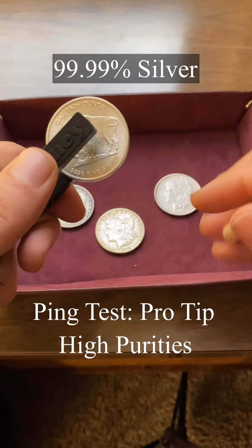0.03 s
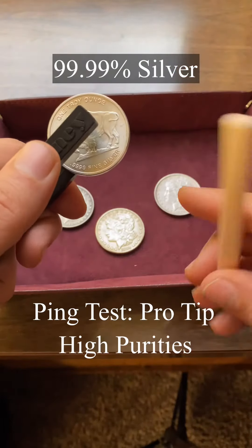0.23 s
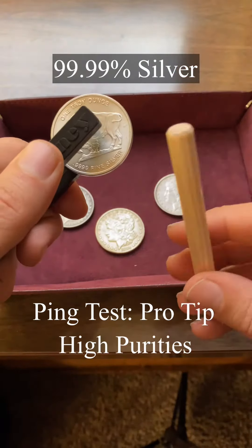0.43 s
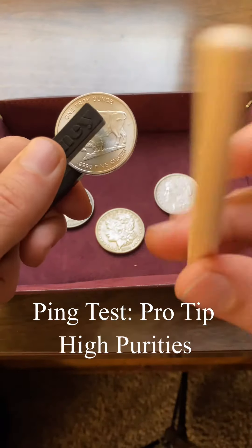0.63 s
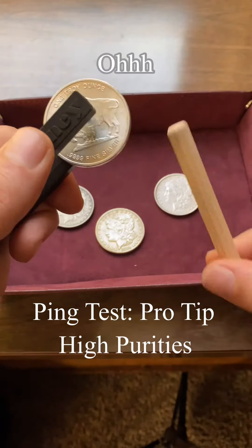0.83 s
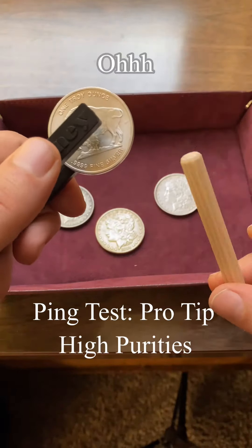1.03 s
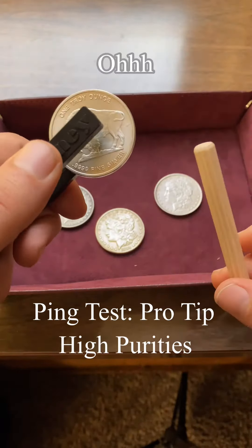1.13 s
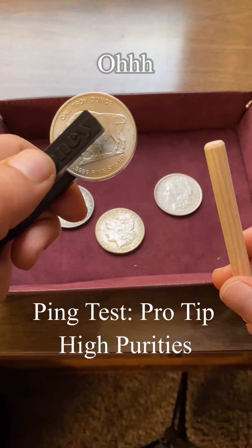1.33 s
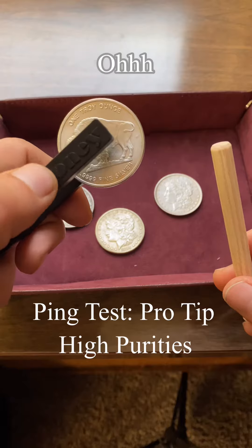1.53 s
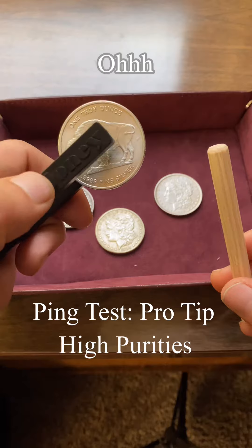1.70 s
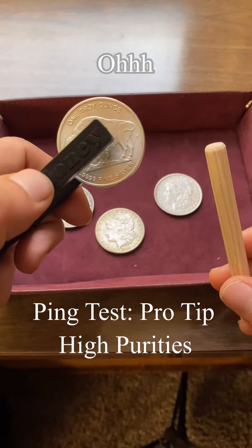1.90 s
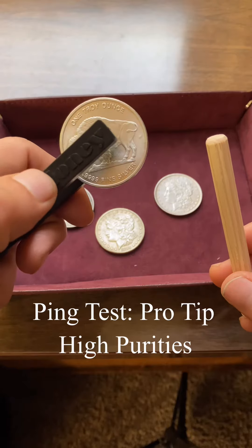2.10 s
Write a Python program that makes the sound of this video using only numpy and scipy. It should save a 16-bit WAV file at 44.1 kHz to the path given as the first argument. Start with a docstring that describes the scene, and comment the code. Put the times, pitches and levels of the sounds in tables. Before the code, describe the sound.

A silver coin tapped once with a wooden stick, a sharp clack and high clear ping

```python
"""A coin tapped with a stick

A silver coin in a plastic clamp is tapped once with a wooden stick, close to the microphone in a small room.
The tap clacks: a pulse, noise and short-lived sines. Two close sines then ring on and beat under a weak overtone.
Fading noise is the room's answer. Swells of hiss are fingers brushing the stick beforehand.
A machine hums low throughout, as a stack of sines, over filtered noise for rumble and hiss."""
import sys
import numpy as np
from scipy import signal
from scipy.fft import rfft, irfft, next_fast_len
from scipy.io import wavfile

SR = 44100
rng = np.random.default_rng(int(sys.argv[2]) if len(sys.argv) > 2 else 0)


def log_audio(samples):
    """Write samples as a 16-bit WAV file to the path given in sys.argv[1]."""
    # one column per channel
    frames = np.atleast_2d(samples).T
    # limit to full scale, then quantise
    limited = np.clip(frames, -1, 1)
    pcm = np.round(limited * 32767).astype(np.int16)
    wavfile.write(sys.argv[1], SR, pcm)


N = 95079

# In all tables, t60/s is the time to fade by 60 dB.
# Spectrum levels are per Hz and only relative: colour() evens out the overall power.

# modes that the blow sets ringing briefly: f/Hz, start level/dB, t60/s, left over right/dB, left lead/rad
CLACK_MODES = [(1760, -35, 0.013, -3, 5.84), (2200, -28.5, 0.032, -2, 1.2), (2629, -24.5, .028, -1, -0.6),
               (3330, -20.5, .025, -3, .5), (3870, -11, 0.036, -3.5, 0), (3980, -26, .08, -2, .5),
               (5400, -8, 0.0042, -1, 2.4), (7538, -14, .06, -2.5, -3), (9250, -28, 0.015, -6.5, -0.5)]
# spectrum of the contact crack: f/Hz, level/dB
CRACK_SPECTRUM = [(150, -13), (300, -13), (550, -19.5), (850, -10), (1300, -17.5), (2200, 0.5), (4500, 4.5),
                  (6000, 2), (7000, -3), (8500, -13), (10400, -17.5), (11500, -10), (12600, -11),
                  (13700, -26), (15000, -13), (16000, -18)]
# the coin's lowest mode, split in two by its relief, then an overtone: f/Hz
RING_HZ = (4321.7, 4356.3, 9991)
# the same three modes before the swell and the fade: level/dB
RING_DB = (-31.5, -24.5, -51)
# the same three modes: t60/s
RING_T60_S = (.99, 0.95, 0.3)
# spectrum of the room's answer to the tap: f/Hz, level/dB
ROOM_SPECTRUM = [(150, -13), (450, -17.5), (900, -14), (1300, -18.5), (2300, -6), (3200, -5.5),
                 (3600, -0.5), (3870, 10.5), (4150, 1), (4850, -12.5), (5600, -7.5), (7000, -13),
                 (7550, -4), (8100, -27.5), (9400, -13.5), (10500, -33), (11800, -24.5), (13000, -42.5),
                 (16000, -50.5)]
# how long the room rings in each band: f/Hz, t60/s
ROOM_T60 = [(200, 0.13), (1000, 0.25), (2000, .28), (3900, .3), (6000, .23), (12000, 0.15)]
# fingers brushing the stick: middle t/s, half length/s, peak level/dB
BRUSHES = [(0.078, 0.025, -63), (0.2, 0.02, -70.5)]
# spectrum of their hiss: f/Hz, level/dB
BRUSH_SPECTRUM = [(2500, -25.5), (4000, -18), (6200, -19), (7700, -24.5), (9400, 5), (12500, -10),
                  (13700, -18.5), (15300, 4), (16000, -10.5)]
# turning speed of the machine: t/s, f/Hz (turns per second)
HUM_SPEED = [(0, 39.7), (.3, 37.8), (.65, 38.9), (1.0, 39.2), (1.4, 39.5), (1.8, 39.8), (2.15, 40.5)]
# the hum's two main partials: t/s, second partial level/dB, third partial level/dB
HUM_LEVEL = [(0, -33.5, -46.5), (.25, -32.5, -40), (.55, -33, -40.5), (.9, -31, -41.5), (1.151, -33, -46),
             (1.45, -29.5, -48), (1.6, -29.5, -52.5), (1.85, -33, -47.5), (2.15, -32, -52.5)]
# its weaker partials: multiple of the turning speed, level/dB
HUM_UPPER = [(4, -59), (5, -67)]
# spectrum of the background rumble and hiss: f/Hz, level/dB
FLOOR_SPECTRUM = [(25, -5.5), (40, -7), (56, 3.5), (100, 6.5), (140, -3), (188, 3.5), (220, -6.5),
                  (262, -1), (350, -14.5), (480, -32.5), (900, -38.5), (1500, -42), (4000, -44.5),
                  (8000, -54), (12000, -49.5), (14000, -59.5), (16000, -61.5)]
# stereo width of the background: f/Hz, side against mid level/dB
FLOOR_SIDE = [(30, -17), (100, -18.5), (200, -17), (400, -8), (800, 0.5), (3000, -1.5), (8000, -4),
              (15000, -7.5)]

TAP_S = .709  # moment of the blow
CRACK_DB, PULSE_DB, CRACK_PAN_DB = -15, -2, 0
CRACK_DECAY_S = 0.0024  # time to fall to 37 percent
PORT_LAG_S = 0.00021  # the right microphone port hears the crack later
RING_START, RING_BUILD_S = 0.18, 0.033  # direct share at the blow; the room builds up the rest
RING_PAN_DB, RING_LEAD_RAD = 3, .4  # left over right; left leads
ROOM_DB, ROOM_WIDTH, ROOM_BUILD_S = -26.5, 0.94, 0.0094
HUM_LAG_S, HUM_PAN_DB = .00013, -0.54  # the hum reaches the left port later
FLOOR_DB = -56  # level of the mid, the part shared by both ports
TOP_HZ = 15900  # upper limit of the recorder


def clack(age):
    """The stick meets the coin: one sharp pulse, a scatter of noise and short-lived modes."""
    modes = 0
    for hz, db, t60, side, lead in CLACK_MODES:
        phase = 2 * np.pi * hz * age + np.array([[lead], [0]])
        modes = modes + pan(side) * undb(db) * fade(age, t60) * np.sin(phase)
    decay = (age > 0) * np.exp(-np.maximum(age, 0) / CRACK_DECAY_S)
    crack = undb(CRACK_DB) * rng.standard_normal(N) * decay
    crack[np.argmax(age > 0)] += undb(PULSE_DB)
    ports = np.array([crack, np.roll(crack, int(PORT_LAG_S * SR))])
    return modes + pan(CRACK_PAN_DB) * colour(ports, CRACK_SPECTRUM)


def ring(age):
    """Two close modes beat as they fade under a brief overtone, swelling at first as the room fills."""
    swell = 1 - (1 - RING_START) * np.exp(-np.maximum(age, 0) / RING_BUILD_S)
    lead = np.array([[RING_LEAD_RAD], [0]])
    modes = 0
    for hz, db, t60 in zip(RING_HZ, RING_DB, RING_T60_S):
        modes = modes + undb(db) * fade(age, t60) * np.sin(2 * np.pi * hz * age + lead)
    return pan(RING_PAN_DB) * swell * modes


def room(age):
    """Echoes of the tap thicken into a tail of noise, each band dying at its own rate."""
    size = next_fast_len(N, True)
    spectrum = rfft(colour(stereo_noise(ROOM_WIDTH), ROOM_SPECTRUM), size)
    log_hz = np.log(np.maximum(np.arange(spectrum.shape[1]) * SR / size, 1))
    centres, t60s = np.array(ROOM_T60).T
    tail = 0
    # each row of the identity matrix picks one band, which overlaps its neighbours
    for share, t60 in zip(np.eye(len(centres)), t60s):
        band_gain = np.interp(log_hz, np.log(centres), share)
        band = irfft(spectrum * band_gain, size)[:, :N]
        tail = tail + band * fade(age, t60)
    build = 1 - np.exp(-np.maximum(age, 0) / ROOM_BUILD_S)
    return undb(ROOM_DB) * build * tail


def fingers(t):
    """Soft swells of hiss as skin slides on wood."""
    swell = sum(undb(db) * np.exp(-((t - middle) / half) ** 2) for middle, half, db in BRUSHES)
    return swell * colour(stereo_noise(width=0.95), BRUSH_SPECTRUM)


def hum(t):
    """Low partials at multiples of a machine's turning speed, which dips and then slowly climbs."""
    speed = np.interp(t, *np.array(HUM_SPEED).T)
    lag = np.array([[HUM_LAG_S], [0]])
    turn = 2 * np.pi * (np.cumsum(speed) / SR - speed * lag)
    times, second, third = np.array(HUM_LEVEL).T
    main = [(2, np.interp(t, times, second)), (3, np.interp(t, times, third))]
    partials = 0
    for multiple, db in main + list(HUM_UPPER):
        phase = round(multiple) * turn + 2 * np.pi * rng.random()
        partials = partials + np.sqrt(2) * undb(db) * np.sin(phase)  # root 2 makes the level an rms
    return pan(HUM_PAN_DB) * partials


def background():
    """Indoor rumble and faint hiss: shaped noise, generally wider in the treble than in the bass."""
    size = next_fast_len(N, True)
    mid, side = colour(rng.standard_normal((2, N)), FLOOR_SPECTRUM)
    side_gain = undb(at_hz(FLOOR_SIDE, np.arange(size // 2 + 1) * SR / size))
    side = irfft(rfft(side, size) * side_gain, size)[:N]
    return undb(FLOOR_DB) * np.array([mid + side, mid - side])


def undb(db):
    """Turn decibels into gain."""
    return 10 ** (np.asarray(db) / 20)


def pan(db):
    """Left and right gains for a level difference, left over right."""
    return undb(np.array([[db], [-db]]) / 2)


def fade(age, t60):
    """Exponential decay from the blow on, falling 60 dB in t60 seconds."""
    return (age > 0) * np.exp(-np.log(1000) * np.maximum(age, 0) / t60)


def stereo_noise(width):
    """White noise of rms 1; width is the side against the mid."""
    mid, side = rng.standard_normal((2, N))
    return np.array([mid + width * side, mid - width * side]) / np.sqrt(1 + width ** 2)


def at_hz(table, hz):
    """Read a table on a log-frequency axis."""
    f, value = np.array(table).T
    return np.interp(np.log(np.maximum(hz, 1)), np.log(f), value)


def colour(x, table, size=4096):
    """Give a sound a spectrum with a filter of unit power gain that never sounds ahead of its input."""
    gain = undb(at_hz(table, np.arange(size + 1) * SR / (2 * size)))
    cepstrum = irfft(np.log(gain / np.sqrt(np.mean(gain ** 2))))
    # folding the cepstrum (the transform of the log gain) gathers the response at its start
    cepstrum[1:size] *= 2
    cepstrum[size + 1:] = 0
    response = irfft(np.exp(rfft(cepstrum)))[None, :size]
    return signal.oaconvolve(x, response, axes=-1)[:, :N]


def scene():
    """The tap and its ring over finger noise, hum and room noise."""
    t = np.arange(N) / SR
    age = t - TAP_S  # time since the blow
    return clack(age) + ring(age) + room(age) + fingers(t) + hum(t) + background()


def record(dry):
    """The recorder cuts the top with a steep low-pass filter."""
    low_pass = signal.ellip(10, .1, 80, TOP_HZ, fs=SR, output="sos")
    return signal.sosfilt(low_pass, dry)


dry = scene()
out = record(dry)
log_audio(out)
```